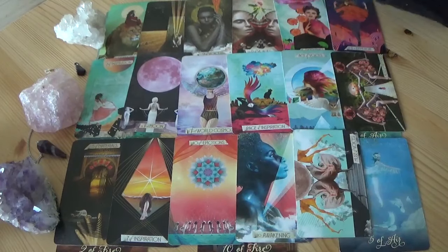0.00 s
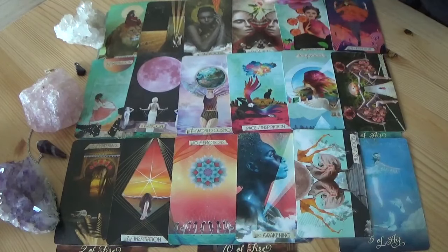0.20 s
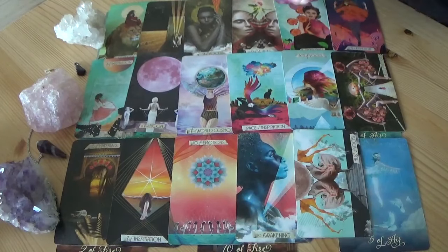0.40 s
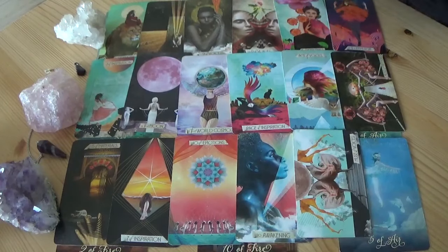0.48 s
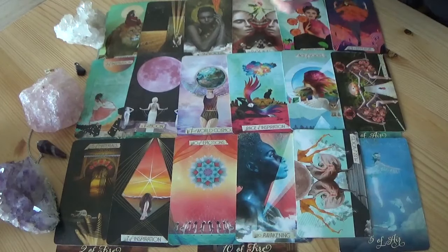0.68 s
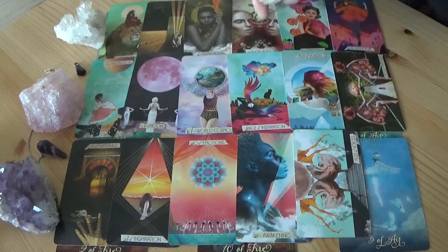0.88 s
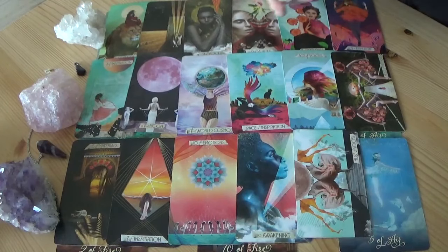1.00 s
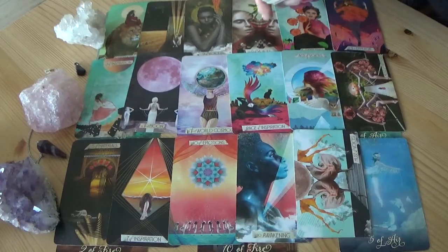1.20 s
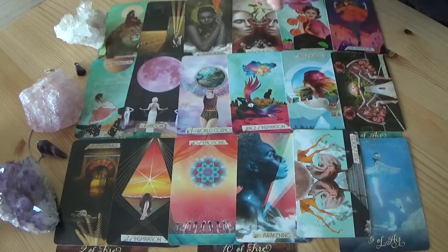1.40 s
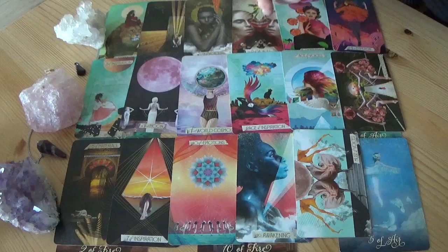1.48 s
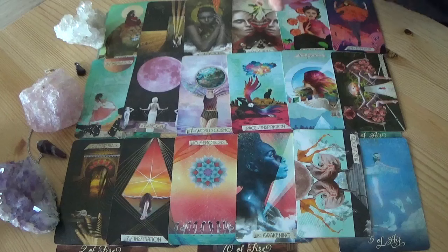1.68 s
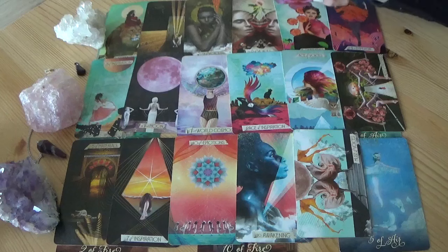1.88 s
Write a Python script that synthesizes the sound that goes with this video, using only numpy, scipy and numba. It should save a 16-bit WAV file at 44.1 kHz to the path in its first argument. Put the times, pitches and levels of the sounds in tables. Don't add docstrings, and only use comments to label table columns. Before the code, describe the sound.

Hand shuffling of a card deck above a wooden table, crisp snaps fading to faint rustles

```python
import sys
import numpy as np
from scipy import signal
from scipy.fft import rfft, irfft
from scipy.io import wavfile
from scipy.ndimage import uniform_filter1d
from numba import njit

SR = 44100
rng = np.random.default_rng(int(sys.argv[2]) if len(sys.argv) > 2 else 0)


def volts_from_db(level):
    exponent = np.asarray(level, float) / 20
    return 10 ** exponent


def bounce(signal):
    frames = np.transpose(np.atleast_2d(signal))
    limited = np.clip(frames, -1, 1)
    pcm = np.round(limited * 32767).astype(np.int16)
    wavfile.write(sys.argv[1], SR, pcm)


N = 83790


def unit(x):
    return x / np.sqrt(np.mean(x ** 2))


@njit
def moving_band(x, centre_hz, width_hz):
    y, band_state, low_state = np.empty(len(x)), 0., 0.
    for i in range(len(x)):
        g = np.tan(np.pi * centre_hz[i] / SR)
        damping = width_hz / centre_hz[i]
        v = (band_state + g * (x[i] - low_state)) / (1 + g * (g + damping))
        band_state = 2 * v - band_state
        low_state += 2 * g * v
        y[i] = damping * v
    return y


def band(x, centre_hz, width_hz):
    return moving_band(x + 1e-18, np.full(len(x), float(centre_hz)), float(width_hz))


def walk(rate_hz):
    hold = int(SR / rate_hz)
    steps = np.repeat(rng.standard_normal(N // hold + 1), hold)
    return 0.98 * uniform_filter1d(uniform_filter1d(steps, hold), hold)[:N]


def room_air():
    # freq_hz, level_db_per_hz
    air_mid = [(20, -7), (35, -6.5), (120, -4), (400, -15.5), (1000, -12.5), (2200, -27.5), (5000, -29.5),
               (11500, -34.5)]
    # freq_hz, level_db
    air_side = [(60, -31), (110, -26), (190, -15.5), (350, -6), (630, -6.5), (1130, -7), (2020, 0),
                (3630, -3), (6530, -4), (11700, -3)]
    log_hz = np.log(np.fft.rfftfreq(N, 1 / SR) + 1)

    def gain(table):
        hz, db = np.array(table).T
        return volts_from_db(np.interp(log_hz, np.log(hz), db))

    mid, side = rfft(rng.standard_normal((2, N))) * gain(air_mid)
    mid, side = irfft(mid, N), irfft(side * gain(air_side), N)
    return np.array([mid + side, mid - side]) / mid.std() * volts_from_db(-53.5)


def mains_hum(t):
    # freq_hz, level_db
    hum_lines = [(101.1, -61), (300, -66.5), (497, -68), (48.6, -62)]
    out = 0
    for hz, db in hum_lines:
        out = out + volts_from_db(db + 2.2 * walk(6.17)) * np.sqrt(2) * np.sin(2 * np.pi * hz * t)
    return out


def far_drone(t):
    # time_s, pitch_hz, level_db
    drone_path = [(0, 138, -69), (.6, 144, -61.5), (.78, 167, -54), (0.999, 160.6, -51), (1.14, 160, -59),
                  (1.22, 137, -56), (1.36, 148, -53.5), (1.55, 152, -60.5), (1.9, 157, -62)]
    time_s, pitch_hz, level_db = np.array(drone_path).T
    hz = np.interp(t, time_s, pitch_hz)
    width_hz = 29.
    narrow = moving_band(rng.standard_normal(N), hz, width_hz)
    return unit(moving_band(narrow, hz, 2 * width_hz)) * volts_from_db(np.interp(t, time_s, level_db))


def room(x):
    t60_s, top_t60_s, split_hz, tail_start_s, tail_db, side_db = 0.74, 0.44, 3100, .012, -8, -6
    echo_s, echo_smear_s, echo_db = 0.00865, .0025, -13
    t = np.arange(SR) / SR
    tails = []
    for _ in range(2):
        noise = rng.standard_normal(SR)
        low = signal.lfilter(*signal.butter(2, split_hz, fs=SR), noise)
        tail = low * volts_from_db(-60 * t / t60_s) + (noise - low) * volts_from_db(-60 * t / top_t60_s)
        tail = tail * np.clip(t / tail_start_s - .5, 0, 1) ** 2
        tails.append(tail / np.sqrt(np.sum(tail ** 2)) * volts_from_db(tail_db))
    echo = rng.standard_normal(SR) * np.exp(-((t - echo_s) / echo_smear_s * 2) ** 2)
    echo = echo / np.sqrt(np.sum(echo ** 2)) * volts_from_db(echo_db)
    mid = signal.fftconvolve(x, tails[0] + echo)[:N]
    side = volts_from_db(side_db) * signal.fftconvolve(x, tails[1])[:N]
    return np.array([mid + side, mid - side])


def table_thuds(t):
    # start_s, level_db, pitch_hz
    thud_events = [(.2415, -31, 890), (.514, -39, 300), (.572, -34, 358), (.585, -29, 610),
                   (.594, -27.5, 990), (.859, -35, 375), (.892, -36.5, 373), (1.168, -38, 376),
                   (1.20, -44, 600), (.92, -40, 780), (1.4665, -39, 630), (1.471, -34.5, 1030)]
    decay_cycles = 10.5
    out = 0
    for start_s, db, hz in thud_events:
        cycles = np.maximum(t - start_s, 0) * hz
        out = out + volts_from_db(db - 60 * cycles / decay_cycles) * np.sin(2 * np.pi * cycles)
    return out


def paper_grain():
    grain_db, flicker_db = 3.5, .8
    return unit(rng.standard_normal(N) * volts_from_db(grain_db * walk(900) + flicker_db * walk(80.3)))


def card_slides(t):
    # start_s, strongest_s, stop_s, level_db, dull_db
    slide_events = [(0, 0.015, 0.065, -52.5, 3.5), (0.059, 0.194, 0.21, -44.5, -9.5),
                    (0.21, 0.221, 0.24, -37.5, 0), (0.5, 0.572, 0.58, -35, 1), (0.784, 0.841, 0.8, -47, -7),
                    (.852, .859, 0.89, -39, 0), (1.081, 1.169, 1.139, -47.5, -8),
                    (1.169, 1.166, 1.1814, -42, 1), (1.376, 1.43, 1.423, -51, -9),
                    (1.447, 1.464, 1.466, -43, 9), (1.744, 1.894, 1.98, -58, 0)]
    bright_hz, bright_width_hz, swell_db = 8500, 6500, 18.5
    bright = band(paper_grain(), bright_hz, bright_width_hz)
    bright = unit(band(bright, bright_hz, 2 * bright_width_hz))
    dull = unit(band(paper_grain(), 1850, 4100))
    out = 0
    for start_s, peak_s, stop_s, db, dull_db in slide_events:
        times_s = [start_s - .01, start_s, peak_s, stop_s, stop_s + 0.0025]
        shape_db = np.interp(t, times_s, [-60, -swell_db, 0, -swell_db / 3, -60])
        out = out + volts_from_db(db + shape_db) * (bright + volts_from_db(dull_db) * dull)
    return out


def packet(snaps, gap):
    length = 2048
    out = np.zeros(N + length)
    t_ms = np.arange(length) / SR * 1000
    for time_s, peak_db, rattle_ms, ring_hz in snaps:
        burst = rng.standard_normal(length) * np.exp(-t_ms / rattle_ms) * volts_from_db(-13.5)
        burst[0] = 1
        body = volts_from_db(-7) * band(burst, 4760, 9700)
        for k, (hz, width_hz, db) in enumerate(gap):
            body = body + (-1) ** k * volts_from_db(db) * band(burst, hz, max(width_hz, 655))
        snap = body + volts_from_db(5.5) * band(body, ring_hz, 590)
        start = int(time_s * SR)
        out[start:start + length] += volts_from_db(peak_db) * snap / np.abs(snap).max()
    return out[:N]


def packet_snaps():
    # time_s, peak_db, rattle_ms, ring_hz
    snaps_1 = [
        (0.017, -39.5, 8.6, 1750),
        (0.2217, -25, 5.4, 3730),
        (.2322, -9.5, 0.66, 4300),
        (.2398, -15.5, 0.47, 3800),
        (.2408, -5.5, 1.85, 3940),
        (0.2496, -20, 1.7, 2470),
    ]
    snaps_2 = [(.5100, -24.5, 2.3, 6900), (0.5123, -15.5, 0.51, 7360), (.5126, -17.5, 1.4, 4540),
               (0.5217, -22, 1.5, 6300)]
    snaps_3 = [(0.5565, -27, 2.7, 7900), (0.5707, -21, 1.9, 4960), (.5762, -21.5, 0.48, 6400),
               (0.5784, -11.5, 1.1, 7400), (0.5878, -27, 1.9, 7500), (0.588, -19.5, 1.8, 9400),
               (0.5917, -21, 2.2, 2940)]
    snaps_4 = [(0.8573, -26, 0.85, 6850), (0.8593, -33.5, 1.4, 1700), (0.8645, -33, 2.6, 7600),
               (.8710, -26.5, 1, 4060), (0.8718, -24, 0.78, 7660), (.8780, -41, 0.8, 8100),
               (.8870, -30, 3, 8500)]
    snaps_5 = [(1.1676, -27, 1.7, 1900), (1.168, -31.5, 1.5, 3870), (1.179, -31, 2, 2160)]
    snaps_6 = [(1.424, -36.5, 4.2, 9600), (1.4374, -27.5, 3.6, 8500), (1.447, -39, 1.3, 2700),
               (1.4660, -30.5, 1.1, 8500), (1.4710, -31, 1.8, 1180), (1.7965, -46, 4.4, 8000)]
    # freq_hz, width_hz, level_db
    gap_1 = [(1190, 120, -7.5), (1480, 41, -11.5), (2480, 40, 1), (3860, 150, 3.5), (5360, 240, -1.5),
             (6570, 180, -17), (7740, 390, -6.5), (9360, 66, -4.5)]
    gap_2 = [(1680, 180, -1.5), (2640, 490, 3.5), (2880, 90, -13), (4540, 210, 3.5), (7860, 230, -2.5),
             (10000, 160, -15)]
    gap_3 = [(1800, 88, -6.5), (2690, 110, -0.5), (4160, 210, -5.5), (5250, 260, 1), (6800, 510, -6.5),
             (8880, 130, -1.5)]
    gap_4 = [(1550, 28, -3.5), (4070, 180, 2.5), (6650, 56, -5), (7620, 180, -1.5), (9000, 91, -6),
             (9560, 38, -15)]
    gap_5 = [(1780, 480, 1), (3870, 410, 3.5), (5450, 270, -8), (7360, 230, -13), (8170, 230, -4),
             (8800, 220, -22)]
    gap_6 = [(3370, 85, -5), (6700, 44, -1), (7430, 45, -3), (8470, 58, -2), (9220, 67, 1), (9800, 70, -5)]
    early = packet(snaps_1, gap_1) + packet(snaps_2, gap_2) + packet(snaps_3, gap_3)
    late = packet(snaps_4, gap_4) + packet(snaps_5, gap_5) + packet(snaps_6, gap_6)
    return early + late


def scene():
    t = np.arange(N) / SR
    background = room_air() + mains_hum(t) + far_drone(t)
    cards = table_thuds(t) + card_slides(t) + packet_snaps()
    pan = volts_from_db([[-0.45], [0.45]])
    return (cards + room(cards)) * pan + background


def band_limit(x):
    return signal.sosfilt(signal.butter(12, 12340, fs=SR, output="sos"), x)


def record(dry):
    top_cut = signal.cheby1(12, .5, 10780, fs=SR, output="sos")
    mix = signal.sosfilt(top_cut, dry)
    return band_limit(mix)


dry = scene()
out = record(dry)
bounce(out)
```